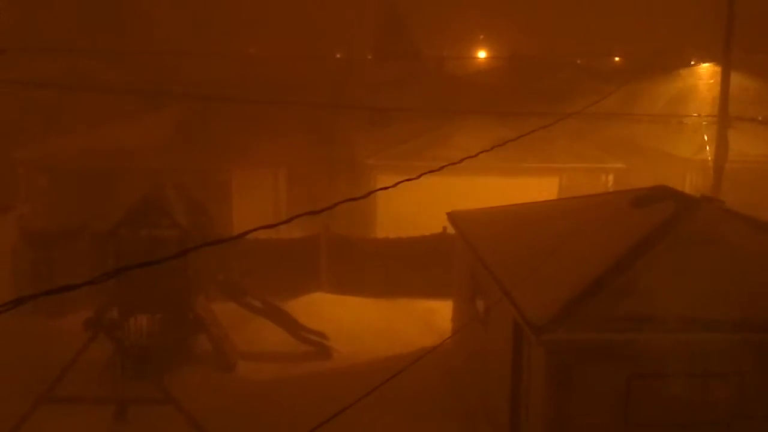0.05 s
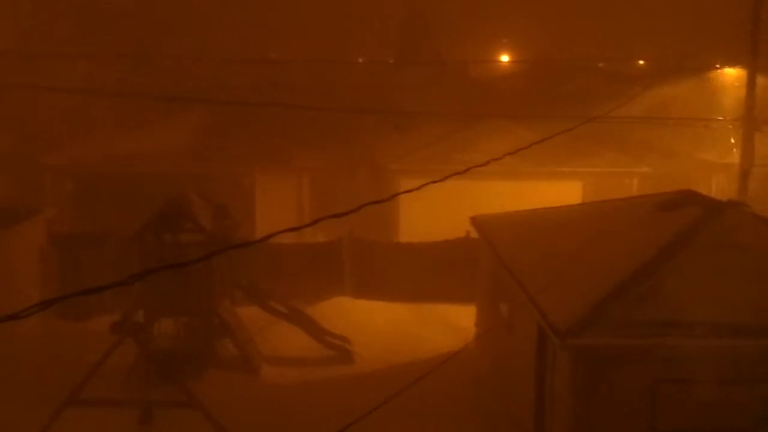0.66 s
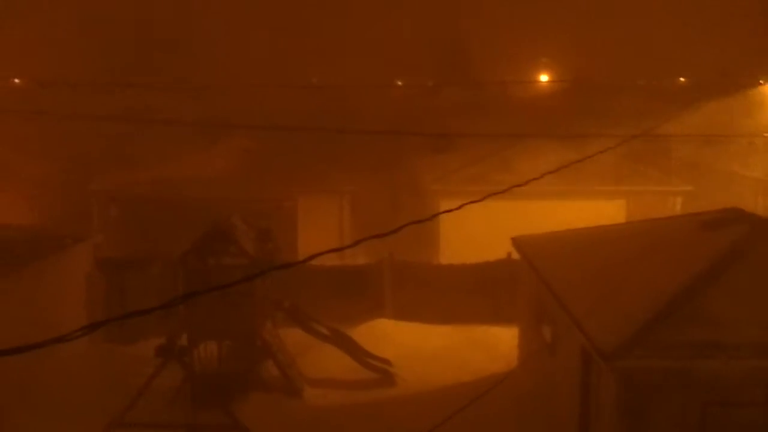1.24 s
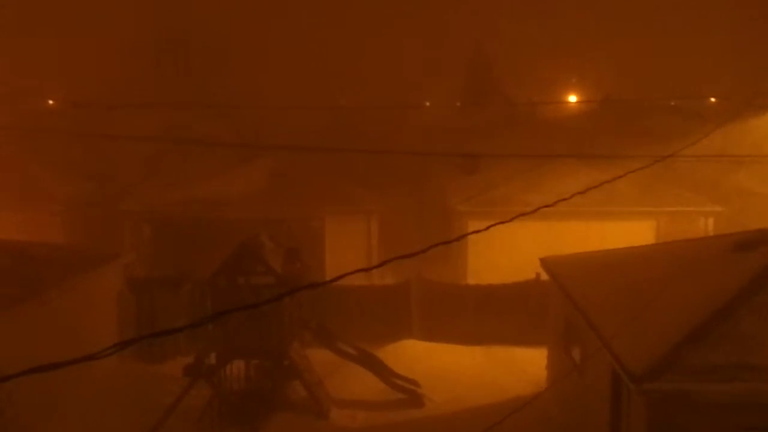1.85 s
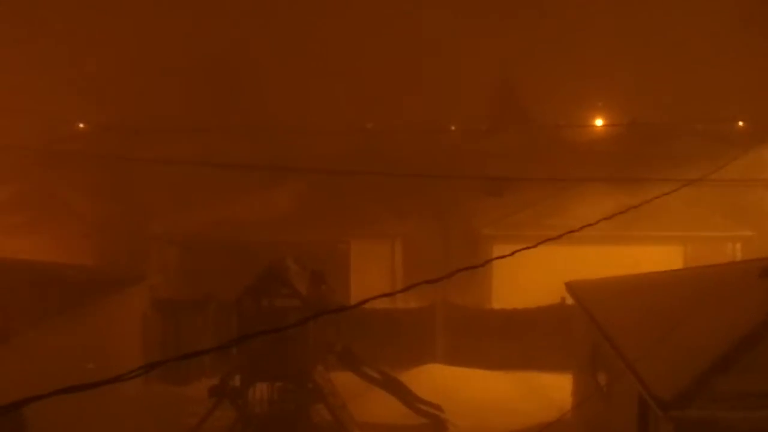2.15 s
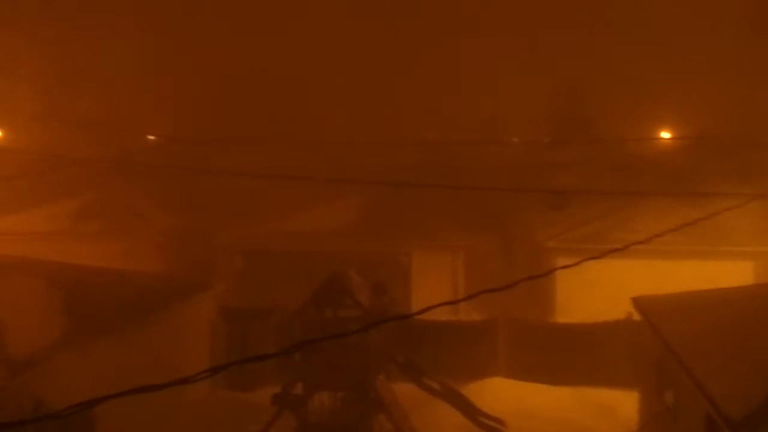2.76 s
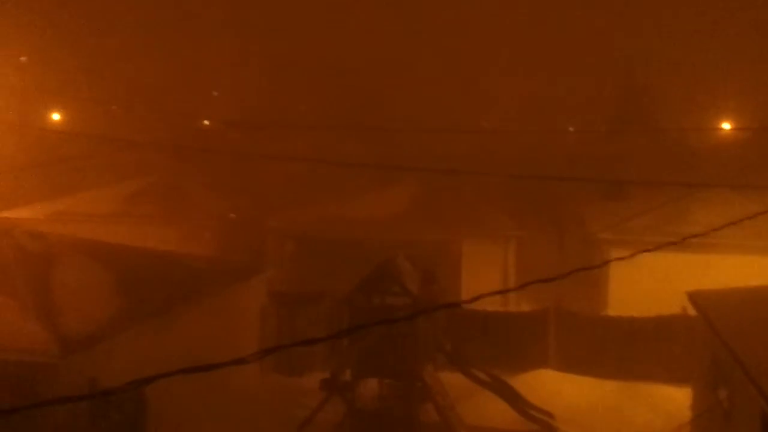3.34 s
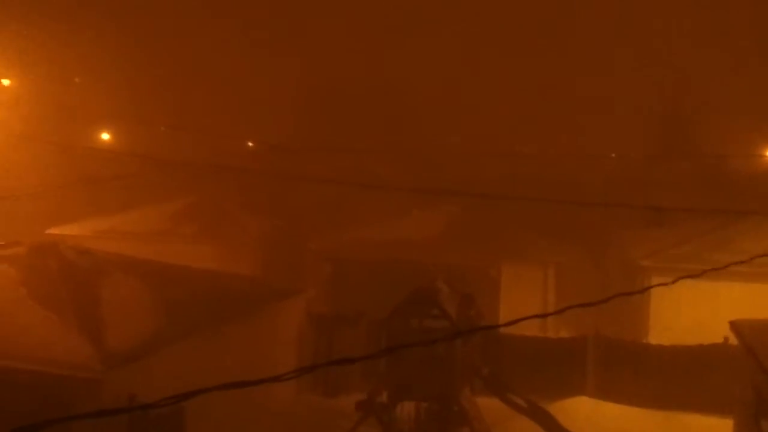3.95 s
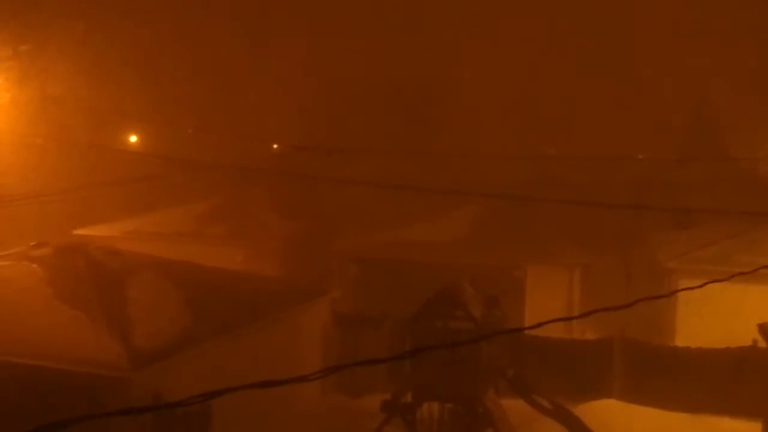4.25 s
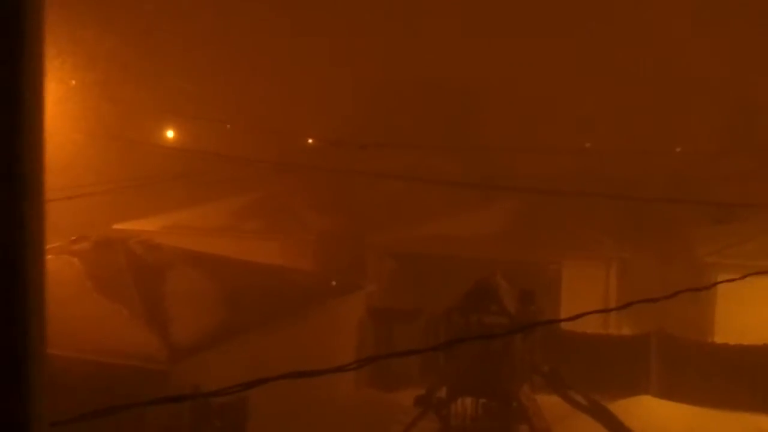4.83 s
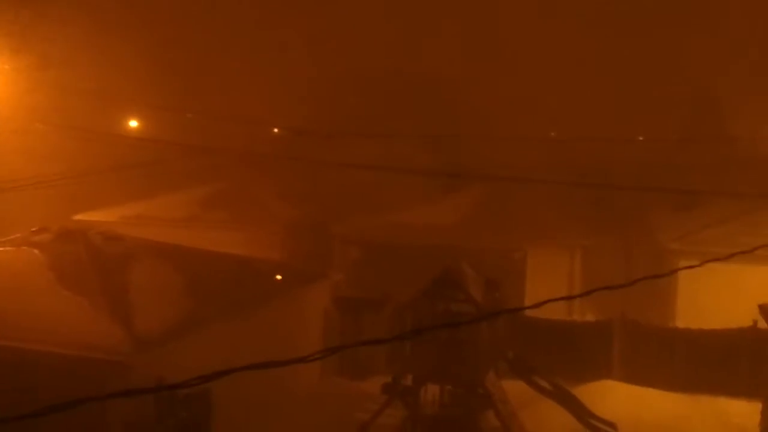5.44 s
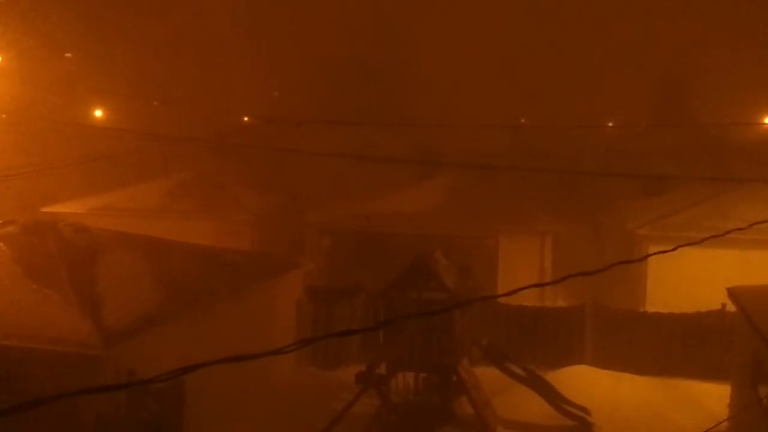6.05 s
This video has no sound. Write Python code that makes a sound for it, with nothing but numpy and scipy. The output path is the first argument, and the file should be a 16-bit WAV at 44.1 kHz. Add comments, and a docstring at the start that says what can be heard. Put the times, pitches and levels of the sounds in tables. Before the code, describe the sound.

Icy snow grains tick against a window, heard from just inside the glass. A first handful lands in sharp, irregular clicks, some with a brief glassy ring. A short lull leaves only faint ticks, then louder grains return and build into thick flurries with a fine fizz of snow dust. A faint steady wind hiss and a low room hum lie underneath throughout.

```python
"""Wind-driven grains of icy snow tick against a window pane, heard from just inside.
From the start the wind hisses, the room hums low and a first handful of grains lands. Each gives a
sharp crack and a brief ring of glass, coloured by where it hits, among fine flakes and fizzing dust.
After about a second comes a lull with only faint ticks. Loud grains return at two seconds,
and from about three seconds to the end they come in thick flurries."""
import sys
import numpy as np
from scipy import signal
from scipy.fft import rfft, irfft, next_fast_len
from scipy.io import wavfile
from scipy.ndimage import uniform_filter1d

SR = 44100
rng = np.random.default_rng(int(sys.argv[2]) if len(sys.argv) > 2 else 0)


def file_out(sig):
    """Save sig as 16-bit WAV at sys.argv[1]."""
    # one column per channel
    cols = np.atleast_2d(sig).T
    # limit, then scale
    lim = np.clip(cols, -1, 1)
    pcm = np.round(lim * 32767).astype(np.int16)
    wavfile.write(sys.argv[1], SR, pcm)


N = 268657
TOP_HZ = 9400  # the sound is cut off above this pitch
LEAD_IN_S = 0.00062  # short silence between a grain's listed start time and its crack

# The large grains. Each row: start in seconds, relative level in dB, brightness in dB per octave,
# ringing in dB compared with the crack, relative knock level in dB, and a list of the pitches
# that the landing spot boosts or mutes (each a pitch in Hz and a change in dB).
LARGE_GRAINS = [(0.018, -39, 0, 20, -66, [(400, 14), (2880, 12), (4400, -10), (5200, -5)]),
                (0.0413, -48.5, -2.5, 7, -77, [(7100, 7)]), (0.1694, -46.5, -3, -7, -78, [(3050, 12)]),
                (0.204, -42, 3, 5, -62, [(1280, 15.5), (3600, -8), (5960, 7)]),
                (0.328, -40, 1, 4, -62, [(1500, 3), (3500, 1), (5360, 7), (7750, 3)]),
                (0.4084, -53, 2.5, -7, -59, [(1460, 22.5)]), (0.466, -54, -2.5, -1, -70, [(1420, 6)]),
                (0.5324, -37, 3, -7, -66, [(1850, 4), (7150, 4.5)]),
                (0.7614, -38, -1.3, -2, -49, [(2670, 5), (3500, -6), (8040, 9)]),
                (1.118, -51, 5.5, -7, -66, [(6150, 13), (7000, 2)]), (1.185, -66, 5, -3, -80, [(7100, 4)]),
                (1.9849, -40, -1, 0, -62, [(3600, 10), (7100, -2)]),
                (1.991, -29.5, 2.3, -10, -55, [(950, 7), (2150, 9), (2750, -13), (3450, 8), (4450, -6),
                (7700, 4)]), (2.4111, -42, 1.8, -7, -65, [(4230, 11)]),
                (2.6825, -38, -1, -3, -55, [(850, 3), (2400, 3.5), (3050, -9), (3700, 5.5), (5470, 5),
                (7000, 5)]), (2.871, -52.5, -4, 2, -74, [(2850, 2)]),
                (2.88, -49, -0.5, 3, -74, [(1430, 3)]), (2.8969, -42.5, 0, 8, -77, [(4190, 9), (5800, 0)]),
                (2.963, -47.5, -3, 9, -73, [(4230, 12)]), (3.0426, -33, -0.5, 6, -60, [(620, -12),
                (1020, 3.5), (1330, -6), (4240, 3)]), (3.103, -47.5, -0.5, -4, -78, [(1520, 9)]),
                (3.166, -45, 1, 12, -72, [(2850, 8)]), (3.221, -47, 3.5, -6, -66, [(2750, 8)]),
                (3.675, -52.5, 3, -1, -83, [(6150, 1)]), (3.7421, -33.2, 1.3, -4, -55, [(2200, -5),
                (2860, 10), (3790, 6)]), (3.775, -49.5, -1, -6, -68, [(2890, 6)]),
                (3.8442, -53, -0.5, 0, -75, [(1830, 15)]), (3.855, -48.5, 1, -2, -72, [(5680, 4)]),
                (3.883, -37.5, 3.5, 8, -68, [(1500, 4.5), (2700, -7), (4300, -6), (6150, 5)]),
                (4.0167, -36, 3, 0, -63, [(2240, 10), (2950, -11), (4050, 8.5), (7180, 7)]),
                (4.1741, -38, -1, 18, -77, [(1570, 8), (1800, 8.5), (4050, 1), (6290, 8)]),
                (4.2272, -39, 2, -5, -78, [(2900, 9), (3400, 12), (7450, 4)]),
                (4.279, -57, -7, -2, -65, [(1570, 11)]), (4.295, -53, -2, 3, -79, [(3430, 8)]),
                (4.32, -47.5, 1, -6, -76, [(2870, 9)]), (4.4096, -46.5, -1.5, -10, -67, [(5500, 13.5)]),
                (4.4685, -31.5, -0.5, -3, -59, [(500, 10), (1000, -2), (4000, 1), (4780, 5), (8040, 7.5)]),
                (4.4724, -38, 4, -14, -59, [(7160, 9.5), (8040, 0)]),
                (4.4954, -44, -0.5, 4.5, -64, [(1820, 2)]), (4.507, -36.5, 3, -1, -55, [(1500, 1),
                (2500, -14), (5750, 9.5), (6500, -7), (7900, 4)]), (4.545, -30, 4.5, -9, -52, [(1550, -11),
                (3410, 6), (4000, -5), (4900, 4), (5500, -7), (7400, 4.5), (8150, -0.5)]),
                (4.7323, -49, 9.5, -9, -79, [(6880, 7.5), (7700, 6)]),
                (4.826, -54, 0.5, -15, -77, [(3170, 13)]), (4.851, -40.5, 1.1, 1, -82, [(3420, 9.5),
                (4300, 8.5)]), (5.0922, -41, -1, 14, -76, [(1010, 12.5), (1400, 1), (7800, 9), (8280, 6)]),
                (5.327, -38, -0.5, 14, -75, [(1560, 13), (2400, -6), (6820, 5)]),
                (5.353, -64, -4, -4, -82, [(2900, 6)]), (5.495, -44.5, 2, -5, -76, [(3400, 10), (6380, 8)]),
                (5.5226, -35.5, 2, -3, -72, [(2650, -5), (3900, 2), (5480, -11), (7500, 2.5)]),
                (5.599, -52.5, -2, -8, -79, [(2840, 10)]), (5.616, -46, 3.5, -3, -75, [(1030, 10)]),
                (5.7116, -56, -3, 0, -83, [(7000, -1)]), (5.718, -32.5, 3, 10, -52, [(613, 15), (3400, 12),
                (4050, 2), (6860, 5.5)]), (5.744, -44.5, -3, -4, -62, [(600, 10)]),
                (5.789, -63, -1, 2, -83, [(7100, 6)]), (5.7955, -57, -4, -15, -80, [(1250, 21)]),
                (5.8015, -29, 1, 0, -67, [(550, -11), (1000, -3), (3820, 6), (5200, 0), (6750, 5),
                (7770, -18)])]
# The pane's own ringing notes. Each row: pitch in Hz, relative level in dB, seconds to fade by 60 dB.
PANE_NOTES = [(530, -12, 0.024), (700, -13.5, 0.022), (1030, 2, 0.0086), (1285, 3, 0.059),
              (1487, 6.5, 0.068), (1752, 3.5, 0.13), (2970, -6.5, 0.042), (3300, -4, 0.0075),
              (5900, -5, 0.036), (7580, -8, 0.014)]
# How well sound passes through the glass. Each row: pitch in Hz, gain in dB.
THROUGH_GLASS = [(40, -32.5), (170, -29), (500, -11), (950, -9), (1550, -6.5), (2300, -5.5), (3200, -6),
                 (4250, -7), (5300, -4), (6300, -1.5), (7300, 0.5), (8150, -5.5), (9200, -15.5)]


def amp(db):
    """Turns decibels into a number to multiply by."""
    return 10 ** (np.asarray(db) / 20)


def unit_level(x):
    """Scales a signal so that its average strength (rms) is 1."""
    return x / np.sqrt(np.mean(x ** 2) + 1e-20)


def curve_at(points, hz):
    """Looks up a curve of (Hz, value) points, with pitch spaced in octaves."""
    point_hz, value = np.transpose(points)
    return np.interp(np.log(hz + 1), np.log(point_hz + 1), value)


def add_at(mix, start_s, sound):
    """Adds a sound to the mix at its start time."""
    part = mix[max(round(start_s * SR), 0):][:len(sound)]
    part += sound[:len(part)]


def causal_filter(gain):
    """Turns a gain curve into a filter that never sounds before the hit."""
    log_gain = np.log(np.maximum(gain, 1e-5))
    mirrored = np.r_[log_gain, log_gain[-2:0:-1]]
    return np.exp(np.conj(signal.hilbert(mirrored)))[:len(gain)]


def room_hum(steadiness=0.76):
    """The room's low notes hum at a nearly even level and waver a little in pitch."""
    # Each row: pitch in Hz, half width in Hz, average level in dB.
    room_notes = [(88, 4, -72.5), (126, 6, -73.5), (180, 7, -69), (218, 6, -69.5), (240, 2.2, -63.4),
                  (294, 3, -66.5), (308, 4, -69), (335, 3, -73.5), (389, 4, -68.8), (432, 6, -75),
                  (510, 14, -73.5)]
    size = next_fast_len(N)
    hz, out = np.arange(size // 40) * SR / size, np.zeros(N)
    for pitch, width, db in room_notes:
        real, imag = rng.standard_normal((2, len(hz)))
        tone = np.fft.ifft((real + 1j * imag) / (1 + ((hz - pitch) / width) ** 2), size)[:N]
        loudness = np.hypot(abs(tone), np.std(tone) / 2)
        out += amp(db) * unit_level(tone.real / loudness ** steadiness)
    return out


def wind(level_db=-53.2, patch_db=1.16, rumble_hz=550):
    """Wind behind the glass: a steady hiss with faint drifting patches, over a gently gusting rumble."""
    # The wind's tone colour. Each row: pitch in Hz, relative level in dB.
    wind_colour = [(18, -50), (30, -27), (85, -5.5), (174, -4), (236, -4.5), (340, -8), (451, -8.6),
                   (638, -12.5), (786, -13.5), (1060, -13.7), (1370, -13.2), (2030, -15), (2600, -18),
                   (3710, -19.8), (7600, -17.3), (9880, -39.5), (16700, -120)]
    # The gusts. Each row: time in seconds, change in the rumble's level in dB.
    gusts = [(0, -1.5), (1.2, -0.1), (2.3, -1), (3.2, -0.5), (4.1, 0.5), (4.7, -0.3), (5.2, -1),
             (6.1, -1.5)]
    frames, hz = N // 512 + 5, np.fft.rfftfreq(2048, 1 / SR)
    real, imag, patches = rng.standard_normal((3, frames, len(hz)))
    patches = uniform_filter1d(patches, size=8, axis=0)  # smooth over time
    patches = unit_level(uniform_filter1d(patches, size=24, axis=1))  # and over pitch
    gust_db = np.interp(np.arange(frames) * 512 / SR, *np.transpose(gusts))
    rumble_db = gust_db[:, None] / (1 + (hz / rumble_hz) ** 4)
    gain = amp(curve_at(wind_colour, hz) + patch_db * patches + rumble_db) * (hz < TOP_HZ)
    _, noise = signal.istft(((real + 1j * imag) * gain).T, nperseg=2048, noverlap=1536)
    return amp(level_db) * unit_level(noise[:N])


def room_echo(x, echo_db=-26, fade_s=0.072):
    """The faint, short echo of a furnished room."""
    t = np.arange(SR // 2) / SR
    tail = rng.standard_normal(len(t)) * amp(-60 * t / fade_s) * (t > .008)
    return amp(echo_db) * signal.fftconvolve(x, tail / np.linalg.norm(tail))[:N]


def snow_dust(level_db=-64.8, spread_s=.05, specks_per_s=250, low_cut_hz=4000):
    """Snow dust brushes the glass in a fine fizz, thickest where the large grains crowd together."""
    slots = [round(row[0] * 100) for row in LARGE_GRAINS]  # 100 time slots a second
    landings = np.bincount(slots, minlength=N * 100 // SR + 1)
    nearby = np.convolve(landings, signal.windows.gaussian(51, spread_s * 100), "same")
    thickness = np.interp(np.arange(N) * 100 / SR, np.arange(len(nearby)), nearby)
    specks = rng.standard_normal(N) * (rng.random(N) < specks_per_s * thickness / SR)
    size = next_fast_len(N, True)
    hz = np.fft.rfftfreq(size, 1 / SR)
    treble = hz ** 3 / (hz ** 3 + low_cut_hz ** 3) * (hz < TOP_HZ)
    colour = amp(curve_at(THROUGH_GLASS, hz)) * treble
    return amp(level_db) * unit_level(irfft(rfft(specks, size) * colour, size)[:N])


def fine_flakes(softest_db=-68.0, spread_db=2.4, flakes_per_s=5, flakes_per_grain=4, scatter_s=.035):
    """Fine flakes patter faintly at random times, and more thickly around the large grains."""
    steady = rng.uniform(0, N / SR, round(flakes_per_s * N / SR))
    flurries = np.repeat([row[0] for row in LARGE_GRAINS], flakes_per_grain)
    times = np.r_[steady, flurries + scatter_s * rng.standard_normal(len(flurries))]
    out = np.zeros(N)
    for start_s, (smallness, place) in zip(times, rng.random((len(times), 2))):
        size_db = -spread_db * np.log(max(smallness, .05))
        note_hz = PANE_NOTES[int(place * len(PANE_NOTES))][0]
        flake = grain_tick(bright_db=-3.0, ring_db=-4, spot=[(note_hz, 8)])
        add_at(out, start_s, amp(softest_db + size_db) * flake)
    return out


def pane_knock(size=2048, give_s=0.00084, recoil=0.45):
    """The whole pane gives way and slowly springs back: a soft, deep push."""
    progress = np.maximum(np.arange(size) / SR - LEAD_IN_S, 0) / give_s
    return unit_level(progress * (1 - recoil * progress / 2) * np.exp(-progress))


def strike_spectrum(ring_db, size=2048, crush_s=.0007, ring_fade_s=.031):
    """A grain crushes in an instant, then waves in the glass bounce between the pane's edges."""
    t, hz = np.arange(size) / SR, np.fft.rfftfreq(size, 1 / SR)
    age = np.maximum(t - LEAD_IN_S, 0)
    crush = age / crush_s
    crack = crush ** 2 * np.exp(1 - crush ** 2)
    # returning waves arrive in bunches
    bunches_db = 3.5 * np.tanh(unit_level(uniform_filter1d(rng.standard_normal(size), size=40)))
    ring = amp(ring_db - 60 * age / ring_fade_s + bunches_db) * np.minimum(crush, 1)
    # the waves keep an even strength while their timing wanders
    noise = signal.resample(rng.standard_normal(size * 2 // 5), size)
    waves = np.cos(np.angle(signal.hilbert(noise)))
    hit = waves * np.hypot(crack, ring)
    notes = sum(amp(db - 60 * t / fade_s) * np.cos(2 * np.pi * pitch * t)
                * 2 * np.log(1000) / (fade_s * SR) for pitch, db, fade_s in PANE_NOTES)
    spectrum = rfft(hit + signal.fftconvolve(hit, notes)[:size])
    # so short a hit spreads its energy evenly over low and high pitches
    outline = np.sqrt(abs(uniform_filter1d(abs(spectrum) ** 2, size=29)))
    heard = hz < TOP_HZ
    spectrum *= causal_filter(1 / np.interp(hz, hz[heard], outline[heard]))
    return spectrum / np.std(irfft(spectrum * heard))


def grain_tick(bright_db, ring_db, spot, size=2048, tilt_from_hz=500, pivot_hz=4000):
    """One hit heard through the glass: hard grains are brighter, and the landing spot colours it."""
    hz = np.fft.rfftfreq(size, 1 / SR)
    tilt_db = bright_db * np.log2(np.maximum(hz, tilt_from_hz) / pivot_hz)
    # each boost or dip has a half width of 92 Hz plus 2.8% of its pitch
    spot_db = sum(db / (1 + ((hz - pitch) / (92 + 0.028 * pitch)) ** 2) for pitch, db in spot)
    colour = causal_filter(amp(curve_at(THROUGH_GLASS, hz) + tilt_db + spot_db))
    fade_out = np.linspace(1, 0, size) ** .5
    return irfft(strike_spectrum(ring_db) * colour) * fade_out


def large_grains(tick_gain_db=1.0, knock_gain_db=-5.0):
    """Each large grain hits the pane with a sharp tick and a soft knock under it."""
    out = np.zeros(N)
    for start_s, level_db, bright_db, ring_db, knock_db, spot in LARGE_GRAINS:
        tick = amp(level_db + tick_gain_db) * grain_tick(bright_db, ring_db, spot)
        knock = amp(knock_db + knock_gain_db) * pane_knock()
        add_at(out, start_s, tick + knock)
    return out


def scene():
    """Snow on the glass and its echo, over wind and hum, in one channel."""
    snow = large_grains() + fine_flakes() + snow_dust()
    return (snow + room_echo(snow) + wind() + room_hum())[None]


def record(dry):
    """The microphone softens the highest treble, then a filter cuts off the very top."""
    # The microphone's response. Each row: pitch in Hz, relative level in dB.
    microphone = [(7600, -5), (8000, -3.5), (8400, -9), (8700, -16), (9000, -29), (9400, -36)]
    response_db = curve_at(microphone, np.fft.rfftfreq(N, 1 / SR))
    softened = irfft(rfft(dry) * amp(response_db - response_db[0]), N)
    low_pass = signal.firwin(511, TOP_HZ, window=("kaiser", 9), fs=SR)
    return signal.oaconvolve(softened, low_pass[None], "same")


dry = scene()
out = record(dry)
file_out(out)
```